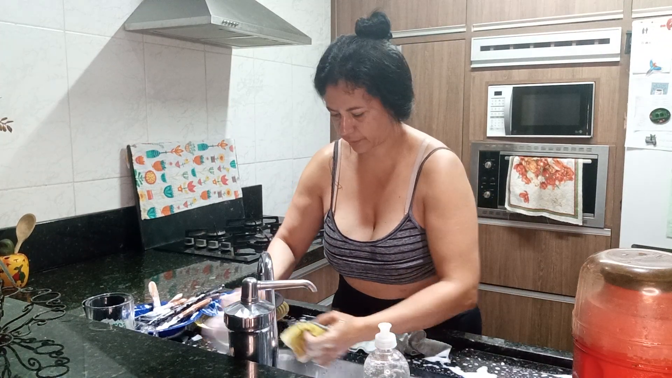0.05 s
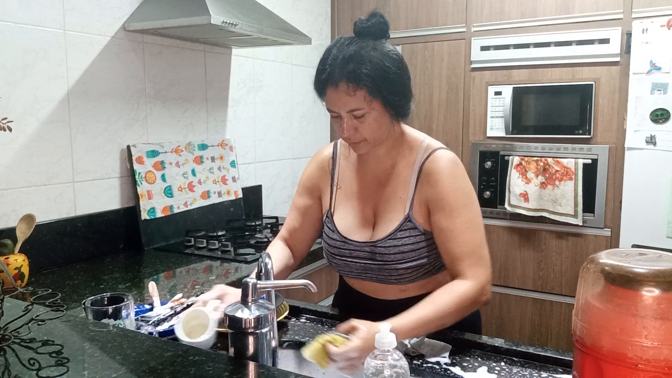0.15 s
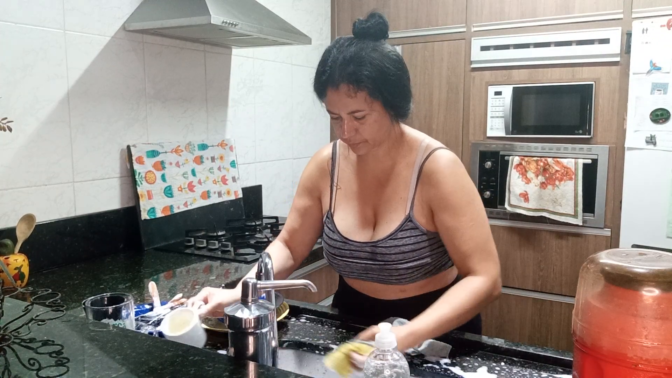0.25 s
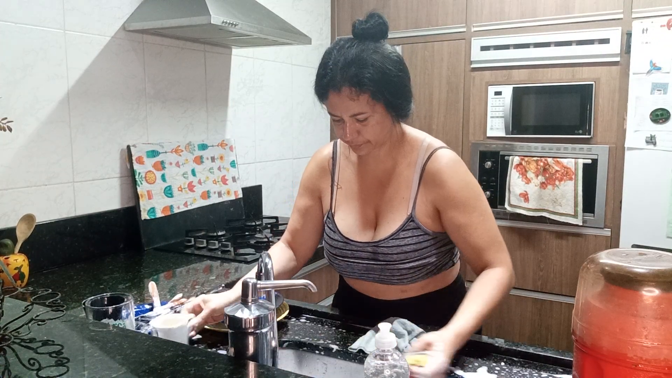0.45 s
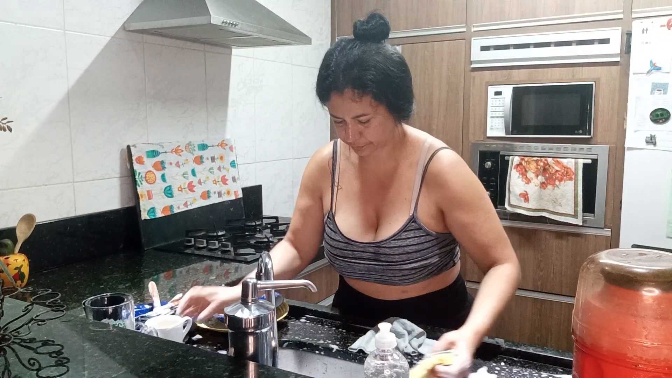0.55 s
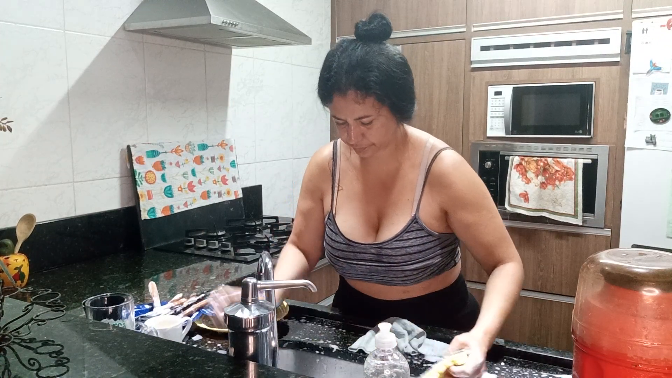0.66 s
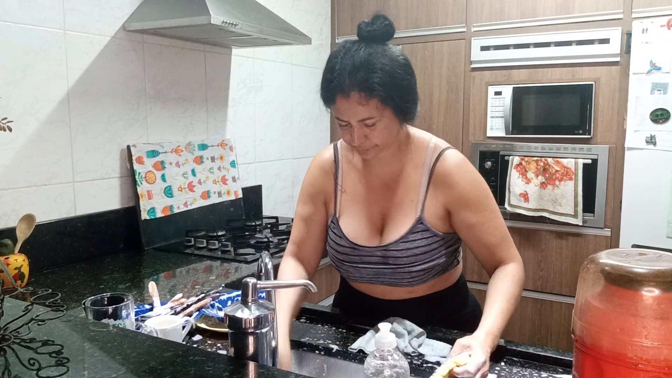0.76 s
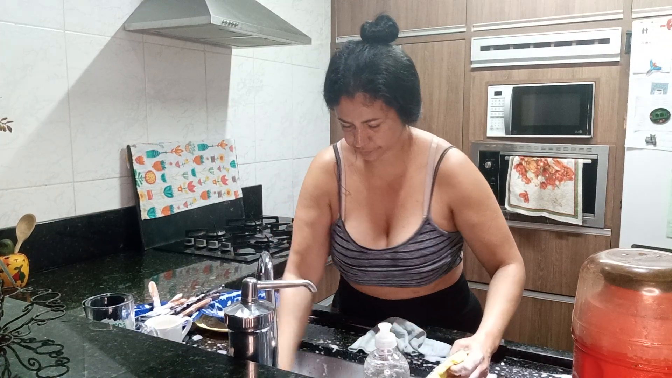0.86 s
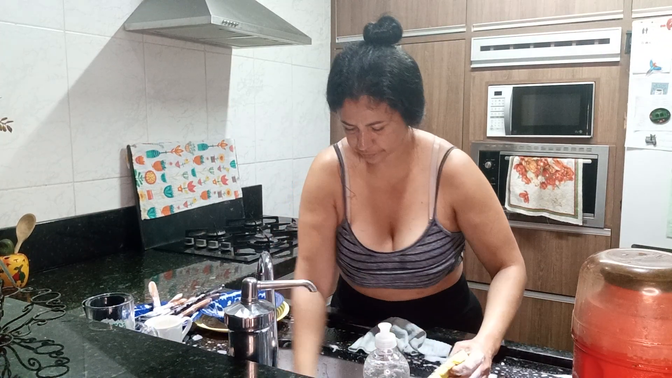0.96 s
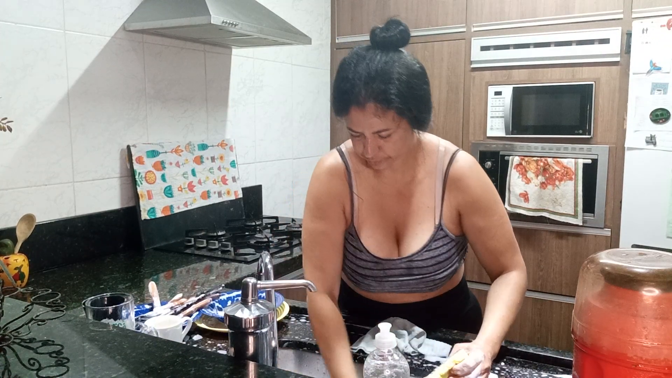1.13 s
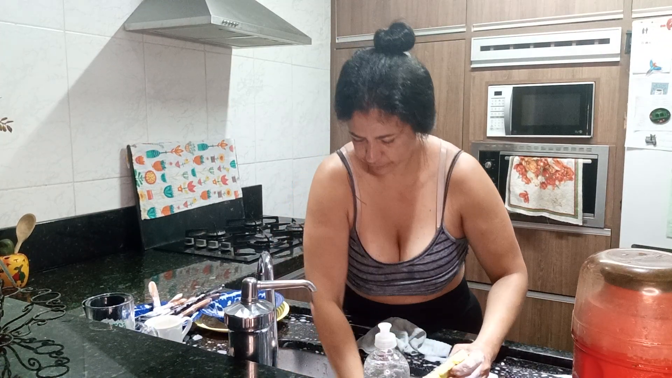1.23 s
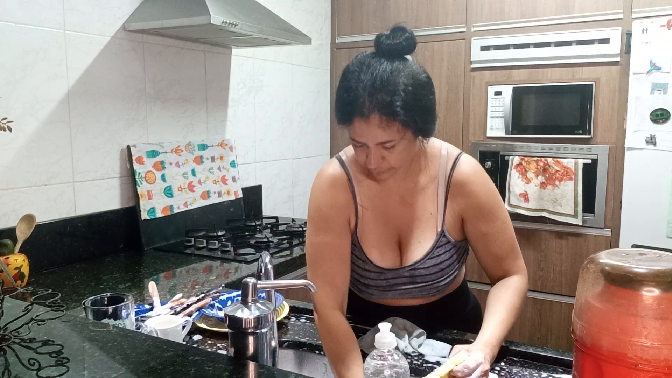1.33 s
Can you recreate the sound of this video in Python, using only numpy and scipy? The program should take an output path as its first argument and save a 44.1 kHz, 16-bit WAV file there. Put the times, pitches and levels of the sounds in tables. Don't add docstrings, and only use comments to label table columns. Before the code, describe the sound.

Dish clatter in a small tiled kitchen, heard by one nearby microphone: a loud dull cup knock, a second knock with shimmering cutlery, then a soft basin bump and gentle watery stirring over faint hum.

```python
import sys
import numpy as np
from scipy import signal
from scipy.io import wavfile
from scipy.ndimage import uniform_filter1d

SR = 44100
rng = np.random.default_rng(int(sys.argv[2]) if len(sys.argv) > 2 else 0)


def ratio_of_db(decibels):
    return 10 ** (np.asarray(decibels, float) / 20)


def wrap_up_sound(samples):
    columns = np.atleast_2d(samples).T
    tamed = np.clip(columns, -1, 1)
    steps = np.round(tamed * 32767).astype(np.int16)
    wavfile.write(sys.argv[1], SR, steps)


N = 61740


def evened(x):
    return x / np.sqrt(np.mean(x ** 2) + 1e-20)


def read(points, hz):
    f, value = np.transpose(points)
    return np.interp(np.log(hz + 1), np.log(f + 1), value)


def add(mix, s, sound):
    part = mix[round(s * SR):][:len(sound)]
    part += sound[:len(part)]


def colour(points, tilt_db=0., size=4096):
    hz = abs(np.fft.fftfreq(size, 1 / SR))
    db = read(points, hz) + tilt_db * np.log2((hz + 50) / 1000)
    log_gain = np.log(ratio_of_db(np.maximum(db, -100)))
    pulse = np.fft.ifft(np.exp(np.conj(signal.hilbert(log_gain)))).real[:size // 2]
    return pulse / np.linalg.norm(pulse)


def ring(hz, db, t60):
    t = np.arange(SR // 2) / SR
    return ratio_of_db(db - 60 * t / t60) * np.sin(2 * np.pi * hz * t)


def tumble(depth_db, size):
    haze_db, haze_hz = -11, 900
    t = np.arange(size) / SR
    swings = [np.sin(2 * np.pi * (f * t + rng.random())) for f in np.geomspace(5, 35, 8)]
    slow = evened(sum(swings))
    haze = evened(uniform_filter1d(rng.standard_normal(size), size=int(SR / haze_hz)))
    return ratio_of_db(depth_db * slow) + ratio_of_db(haze_db) * haze


# frequency in Hz, t60 in s.
ROOM_DECAY = [(100, 0.31), (300, 0.67), (1000, 0.53), (3000, 0.52), (6000, 0.23), (12000, 0.1)]


def kitchen(x):
    rise_s, spacing = 0.003, 20
    taps = np.zeros(SR)
    at = np.arange(0, SR - spacing, spacing)
    taps[at + rng.integers(0, spacing, len(at))] = rng.choice([-1., 1.], len(at))
    hz, t, bands = signal.stft(taps, SR, nperseg=256)
    decay = ratio_of_db(-60 * t / read(ROOM_DECAY, hz)[:, None])
    tail = signal.istft(bands * decay, SR, nperseg=256)[1]
    tail = tail * (1 - np.exp(-np.arange(len(tail)) / SR / rise_s))
    return signal.fftconvolve(x, tail / np.linalg.norm(tail))[:N]


# frequency in Hz, density in dB per Hz.
AIR_COLOUR = [(25, -36.5), (45, -28.5), (60, -8), (90, -18.5), (700, -20), (2300, -27), (4450, -39.5),
              (15800, -46)]


def air():
    air_db, leftover_db, leftover_s = -70, 3, 0.15
    hum_hz, hum_db = 60, -73
    t = np.arange(N) / SR
    white = rng.standard_normal(N + 2048)
    hiss = evened(signal.oaconvolve(white, colour(AIR_COLOUR), "valid")[:N])
    level = ratio_of_db(air_db + leftover_db * np.exp(-t / leftover_s))
    return hiss * level + ratio_of_db(hum_db) * np.sin(2 * np.pi * hum_hz * t)


def bubble(hz, length):
    glide, rise_s = 0.012, 0.002
    t = np.arange(round(4 * length * SR)) / SR
    tone = np.sin(2 * np.pi * hz * t * (1 + glide * t / length))
    return tone * np.minimum(t / rise_s, 1) * np.exp(-2 * t / length)


# time in s, level in dB.
STIR_EFFORT = [(.86, -75), (.925, -65.5), (.945, -58.5), (1.0, -56.5), (1.046, -57.5), (1.07, -59.5),
               (1.14, -53), (1.2, -53), (1.39, -91)]
# frequency in Hz, density in dB per Hz.
WATER_COLOUR = [(70, -31.5), (136, 5.5), (270, -10.5), (900, -2), (1200, 0), (3000, -2.5), (4500, -12.5),
                (15800, -55)]
# time in s, level in dB.
SPRAY_LEVEL = [(.85, -94), (.857, -74), (.92, -87), (1.02, -72), (1.13, -81), (1.16, -66), (1.25, -73),
               (1.35, -84)]


def stirring(count=30):
    bubbles_per_s, size_db, fizz_db = 6900, 6, -0.5
    spray_top_hz, wet_db = 10500, -6
    t = np.arange(N) / SR
    size = ratio_of_db(size_db * np.minimum(rng.exponential(1, N), 4))
    size = size * (rng.random(N) < bubbles_per_s / SR)
    kind = rng.integers(0, count, N)
    crowd = np.zeros(N)
    for k, hz in enumerate(np.geomspace(250, 11000, count)):
        one = bubble(hz, 5 / hz) * np.sqrt(hz)
        crowd += signal.oaconvolve(size * (kind == k), one)[:N]
    brightened = np.diff(crowd, prepend=0) * 3 + crowd
    white = evened(brightened) + ratio_of_db(fizz_db) * rng.standard_normal(N)
    swirl = evened(signal.oaconvolve(white, colour(WATER_COLOUR))[:N])
    swirl = swirl * ratio_of_db(np.interp(t, *np.transpose(STIR_EFFORT), -100))

    grains = rng.standard_normal(N + 1) * ratio_of_db(2 * np.minimum(rng.exponential(1, N + 1), 4))
    low_pass = signal.butter(4, spray_top_hz, fs=SR, output="sos")
    spray = evened(signal.sosfilt(low_pass, np.diff(grains)))
    stir = swirl + spray * ratio_of_db(np.interp(t, *np.transpose(SPRAY_LEVEL), -120, -120))
    return stir + ratio_of_db(wet_db) * kitchen(stir)


# start in s, pitch in Hz, level in dB, length in s.
SINGLE_DROPS = [(0.083, 2210, -52.5, 0.0058), (0.931, 3430, -52.5, .01), (0.948, 2290, -50, 0.014),
                (.96, 4080, -53, 0.0056), (.985, 780, -43, 0.012), (1.024, 1345, -48, .015),
                (1.042, 1557, -48.5, 0.019), (1.079, 2986, -50.5, 0.018), (1.082, 476, -38, 0.0055),
                (1.102, 1250, -43, 0.008), (1.126, 1157, -46, 0.016), (1.141, 1983, -47, .02),
                (1.169, 2560, -46.5, .012), (1.18, 3284, -43, 0.0065), (1.19, 2423, -51, 0.014),
                (1.203, 1860, -45, 0.019), (1.229, 1990, -48.5, 0.013)]
# start in s, level in dB.
SPLASHES = [
    (0.117, -70),
    (.937, -52),
    (1.007, -56),
    (1.141, -59),
]


def drops():
    splash_t60, rise_s, wet_db = 0.03, 0.0016, -8
    t = np.arange(900) / SR
    near = np.zeros(N)
    for s, hz, db, length in SINGLE_DROPS:
        add(near, s, ratio_of_db(db) * bubble(hz, length))
    for s, db in SPLASHES:
        noise = uniform_filter1d(rng.standard_normal(900), size=2)
        add(near, s, ratio_of_db(db - 60 * t / splash_t60) * np.minimum(t / rise_s, 1) * noise)
    return near + ratio_of_db(wet_db) * kitchen(near)


TUMBLE_DB = 3

# frequency in Hz, level in dB, t60 in s.
BASIN_MODES = [(327.4, -1, 0.47), (138, -27, 0.49), (463, -19, 0.34), (600, -21.5, 0.83),
               (679, -19.5, 0.48), (731, -15, 0.45), (890, -27.5, 1)]
# start in s, level in dB, seconds until the hand damps it.
BASIN_BUMPS = [
    (.856, -36, 0.12),
    (1.086, -52, 0.014),
    (1.144, -48.5, 0.018),
    (1.179, -49, 0.14),
]


def basin():
    damp_db_per_s, rise_s = 398, 0.0027
    t = np.arange(SR // 2) / SR
    body = np.zeros(len(t))
    for k, mode in enumerate(BASIN_MODES):
        swing = tumble(TUMBLE_DB, len(t)) if k else 1
        body += ring(*mode) * swing
    body = body * np.minimum(t / rise_s, 1)
    out = np.zeros(N)
    for s, db, free in BASIN_BUMPS:
        add(out, s, body * ratio_of_db(db - damp_db_per_s * np.maximum(t - free, 0)))
    return out


SPOON_PITCHES = [3085, 3275, 5110, 5685, 7488, 8800, 9232, 9959, 10150, 10830, 12100, 13700, 14950, 15700]
# level in dB, t60 in s, beat in Hz, twin's level in dB.
SPOON_PAIRS = [(-40, 0.22, 3.4, -8), (-35.5, 0.13, 5.3, -21), (-41.5, 0.28, 30, -13),
               (-48.5, 0.42, 3.6, -27), (-47, 0.52, 16, -7.5), (-55, 0.29, 17, -11),
               (-46.5, 0.33, 17, -1.5), (-61, .25, 10, -25), (-47, 0.49, 17, -8), (-45.5, 0.37, 25, -7),
               (-46.5, 0.32, 14, -16), (-56, .2, 14, -22), (-59, 0.26, 20, -7.5), (-61.5, .15, 16, -16)]
STRONG_PITCHES = [1642.5, 3935]
# time in s, level in dB.
LOW_SWELL = [(.505, -44), (.53, -31.5), (0.561, -22.5), (.614, -26.5), (.643, -40.5), (0.661, -35.5),
             (0.713, -35), (0.777, -58), (0.878, -58)]
# time in s, level in dB.
HIGH_SWELL = [(.511, -51), (0.513, -31), (0.57, -49), (0.591, -40), (0.628, -41), (.655, -56.5),
              (.672, -53), (0.718, -60), (.86, -73)]


def spoon():
    graze_s, strike_s, graze_db, wet_db = 0.486, 0.5115, -21, -6
    out, t = np.zeros(N), np.arange(N) / SR
    for hz, (db, t60, beat_hz, twin_db) in zip(SPOON_PITCHES, SPOON_PAIRS):
        pair = ring(hz, db, t60) + ring(hz + beat_hz, db + twin_db, t60)
        pair = pair * tumble(TUMBLE_DB, len(pair))
        add(out, strike_s, pair)
        add(out, graze_s, ratio_of_db(graze_db) * pair[:round((strike_s - graze_s) * SR)])
    out = out + ratio_of_db(wet_db) * kitchen(out)
    for hz, swell in zip(STRONG_PITCHES, (LOW_SWELL, HIGH_SWELL)):
        s, db = np.transpose(swell)
        level = uniform_filter1d(ratio_of_db(np.interp(t, s, db, -120, -120)), size=150)
        if hz > STRONG_PITCHES[0]:
            level = level * tumble(TUMBLE_DB * (hz / 5000) ** 2, N)
        out = out + np.sqrt(2) * level * np.sin(2 * np.pi * hz * t)
    return out


# start in s, frequency in Hz, level in dB, t60 in s.
CROCKERY = [
    (0.22, 398, -20, 0.045),
    (0.24, 109, -48, 0.37),
    (0.216, 11600, -60.5, .2),
    (0.23, 5850, -62.5, 0.26),
    (.217, 180, -30.5, 0.074),
    (0.49, 984, -19.5, 0.078),
    (.526, 934, -20.5, 0.049),
    (.55, 920, -27.5, 0.066),
    (.487, 163.2, -38, 0.074),
]


def crockery():
    rise_s, wet_db = 0.0018, -7
    size = SR // 2
    rise = np.minimum(np.arange(size) / SR / rise_s, 1)
    bodies = np.zeros(N)
    for s, hz, db, t60 in CROCKERY:
        add(bodies, s, ring(hz, db, t60) * tumble(1, size) * rise)
    return bodies + ratio_of_db(wet_db) * kitchen(bodies)


# start in s, level in dB, brightness in dB per octave.
BLOWS = [
    (0.2153, -13, -0.5),
    (0.2169, -4, 0),
    (0.2269, -8, 1),
    (0.4814, -30, 12),
    (.486, -9.5, 1),
    (.5115, -21, 6),
    (.53, -14.5, -1.5),
    (.855, -41, -0.5),
]
# frequency in Hz, density in dB per Hz.
BLOW_COLOUR = [(70, -47), (130, -21), (500, -10), (1050, -0.5), (2400, -10.5), (3500, -21.5), (4300, -38),
               (15800, -73)]
# delay in s, level in dB.
WALL_ECHOES = [(.0052, -7), (.0135, -6), (.024, -7), (.039, -6), (.0515, -8), (.0625, -10)]


def knocks():
    tail_db, crunch_db, crunch_s, floor_hz = 9, -13, 0.002, 105
    echoes = np.zeros(SR // 10)
    echoes[0] = 1
    for s, db in WALL_ECHOES:
        echoes[round(s * SR)] = ratio_of_db(db)
    crunch = ratio_of_db(crunch_db) * np.exp(-np.arange(400) / SR / crunch_s)
    out = np.zeros(N)
    for s, db, tilt_db in BLOWS:
        grit = crunch * rng.standard_normal(400) * (rng.random(400) < 0.06)
        blow = np.zeros(N)
        add(blow, s, ratio_of_db(db) * np.convolve(colour(BLOW_COLOUR, tilt_db), np.r_[1, grit]))
        out += signal.oaconvolve(blow, echoes)[:N] + ratio_of_db(tail_db) * kitchen(blow)
    high_pass = signal.butter(4, floor_hz, "high", fs=SR, output="sos")
    return signal.sosfilt(high_pass, out + crockery())


def scene():
    return (knocks() + spoon() + basin() + stirring() + drops() + air())[None]


def top_cut(x):
    return signal.sosfilt(signal.butter(12, 16580, fs=SR, output="sos"), x)


# frequency in Hz, gain in dB.
MIC_COLOUR = [(20, 5.5), (6500, 1), (8200, -5), (9300, 4), (10300, -13.5), (12500, -13), (14000, -8),
              (15300, -8)]


def record(dry):
    gain, edge_hz = 1.368, 15900
    heard = signal.oaconvolve(dry, gain * colour(MIC_COLOUR)[None])[:, :N]
    limited = signal.oaconvolve(heard, signal.firwin(255, edge_hz, fs=SR)[None], "same")
    return top_cut(limited)


dry = scene()
out = record(dry)
wrap_up_sound(out)
```